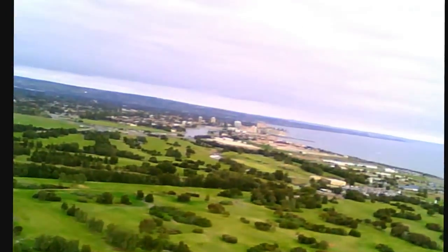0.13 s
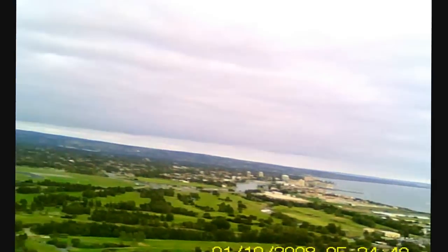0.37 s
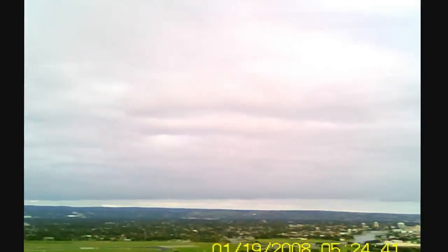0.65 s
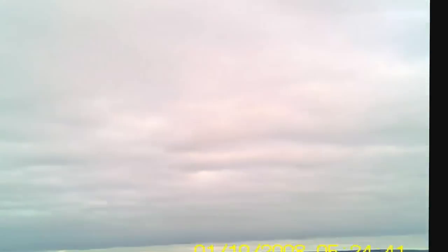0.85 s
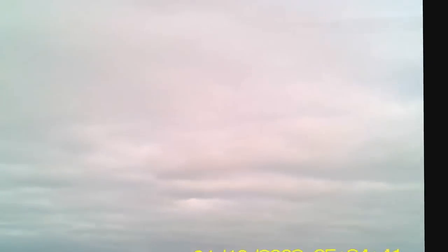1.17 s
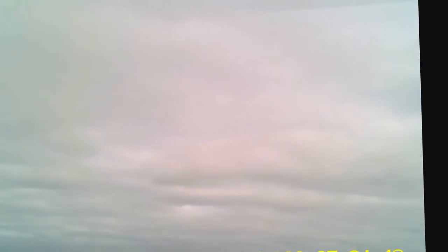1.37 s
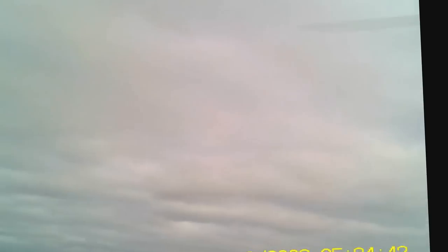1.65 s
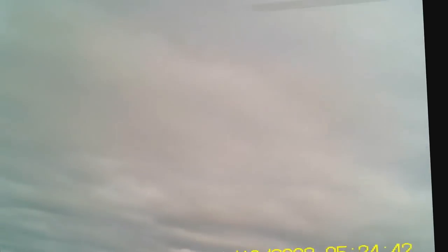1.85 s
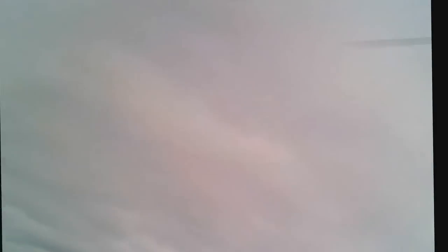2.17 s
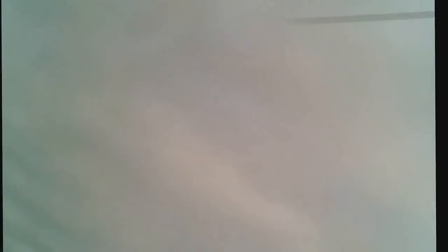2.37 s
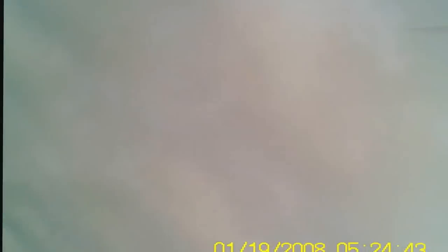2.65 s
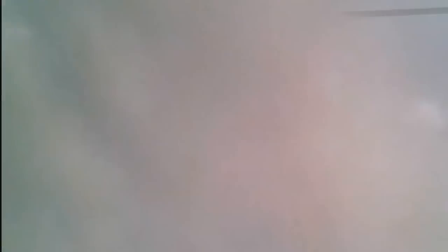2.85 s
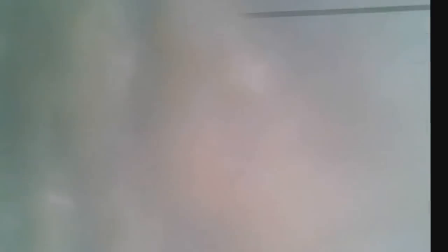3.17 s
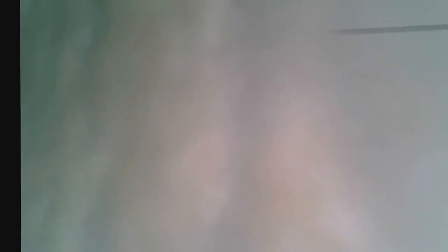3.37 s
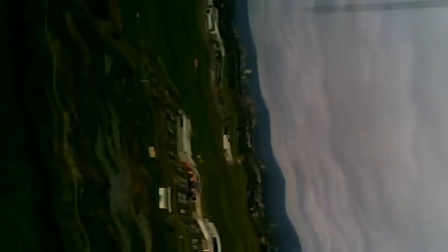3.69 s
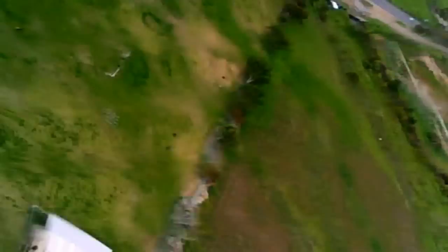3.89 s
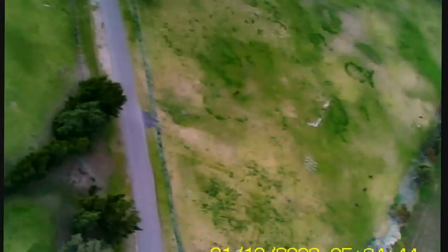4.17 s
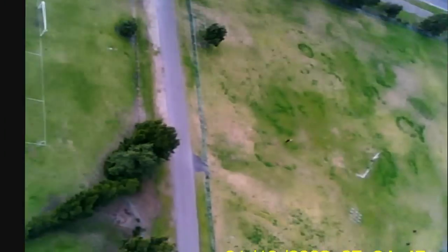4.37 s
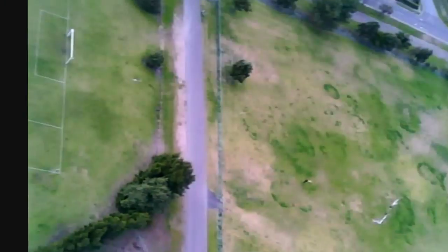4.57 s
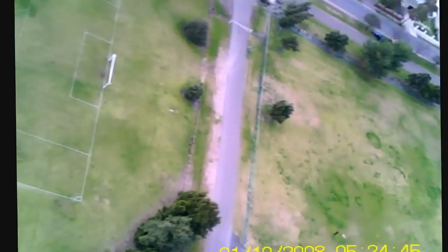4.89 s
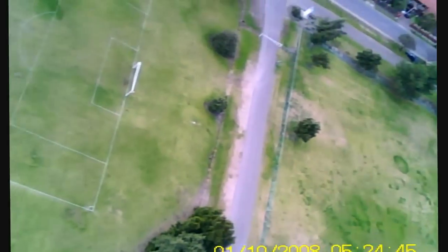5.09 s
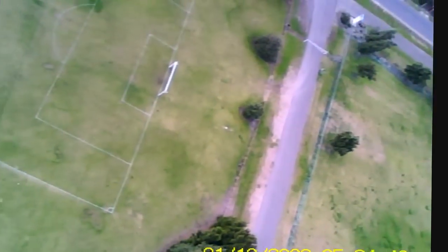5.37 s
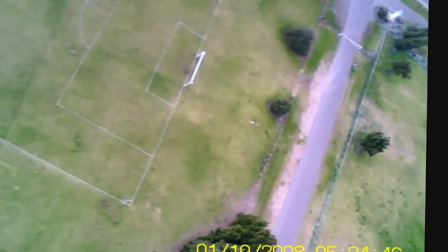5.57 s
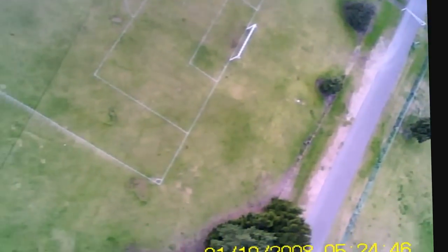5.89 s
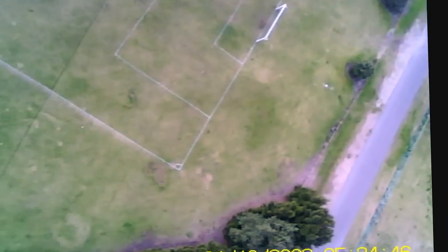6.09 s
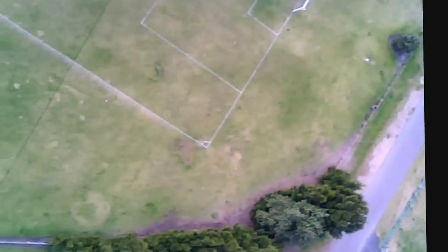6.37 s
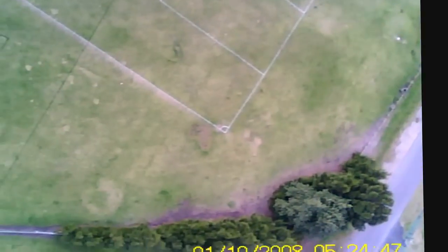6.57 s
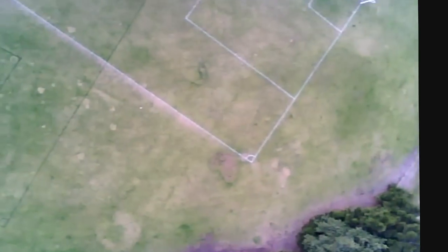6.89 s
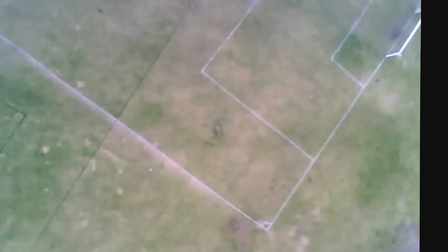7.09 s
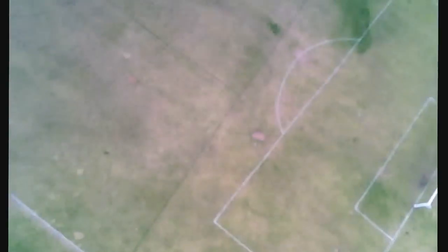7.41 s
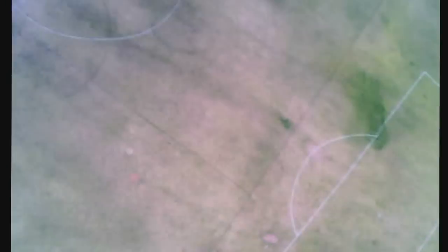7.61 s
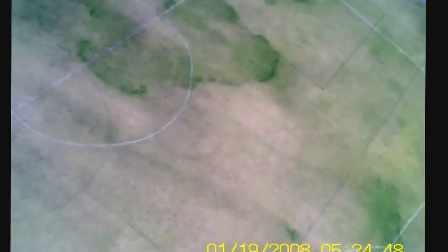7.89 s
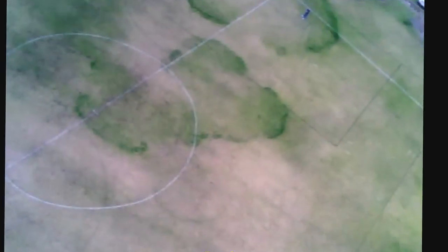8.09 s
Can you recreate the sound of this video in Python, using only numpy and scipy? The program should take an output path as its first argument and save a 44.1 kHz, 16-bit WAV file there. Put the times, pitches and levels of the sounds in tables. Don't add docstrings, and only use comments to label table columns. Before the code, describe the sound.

Close, dry propeller drone at a low pitch grows rough and loud, drops away, then climbs in pitch as wind roars and thumps the microphone.

```python
import sys
import numpy as np
from scipy import signal
from scipy.fft import rfft, irfft
from scipy.io import wavfile
from scipy.ndimage import uniform_filter1d

SR = 44100
rng = np.random.default_rng(int(sys.argv[2]) if len(sys.argv) > 2 else 0)


def to_wav(s):
    ch = np.atleast_2d(s).T
    pcm = np.round(np.clip(ch, -1, 1) * 32767)
    wavfile.write(sys.argv[1], SR, pcm.astype(np.int16))


def decibels_to_gain(level_db):
    exponent = np.asarray(level_db, float) / 20
    return 10 ** exponent


N = 363825

# stall level/dB, gain at full airspeed/dB, power law, rise per dB of extra load/dB
WIND_LAYERS = [
    (-28, 9, 0.86, 0.35),
    (-32, 9.5, 0.87, 0.23),
    (-46, 11.5, 0.86, 0.08),
    (-50.5, 12, 0.74, .05),
]
# f/Hz, level/dB
PORT_COLOUR = [(1800, -4), (2600, -2), (3100, -2), (3900, -3), (4500, -11.5), (5500, -27)]


def curves(table):
    s, *columns = np.transpose(table)
    return [np.interp(np.arange(N) / SR, s, c) for c in columns]


def walk(rate):
    k = int(SR / rate)
    steps = np.repeat(rng.standard_normal(N // k + 1), k)
    return 0.83 * uniform_filter1d(uniform_filter1d(steps, k), k)[:N]


def noise(colour):
    hz, db = np.transpose(colour)
    f = np.fft.rfftfreq(N, 1 / SR) + 1
    shape = decibels_to_gain(np.interp(np.log(f), np.log(hz), db, -90, -90))
    x = irfft(rfft(rng.standard_normal(N)) * shape, N)
    return x / x.std()


def turn(hz):
    return 2 * np.pi * np.cumsum(hz) / SR


def tone(angle, db, flutter_db):
    return np.sqrt(2) * decibels_to_gain(db + flutter_db * walk(25)) * np.cos(angle)


def swell(steady_db, events, edge_s=0.11):
    t = np.arange(N) / SR
    power = decibels_to_gain(2 * np.array(steady_db))
    for start, length, *db in events:
        to_edge = np.minimum(t - start, start + length - t)
        gate = np.clip(to_edge / (2 * edge_s) + 0.5, 0, 1)
        power += decibels_to_gain(2 * np.array(db))[:, None] * gate ** 2
    return list(10 * np.log10(power))


def wind_level(layer, speed, extra_db):
    stall_db, dive_db, law, wash = layer
    return stall_db + dive_db * speed ** law + wash * extra_db


def thumps():
    # t/s, peak level/dB
    eddies = [(1.338, -14), (4.502, -10), (4.912, -13), (5.085, -8), (5.406, -12), (5.65, -9), (5.731, -5),
              (6.253, -8), (7.119, -9), (7.367, -10.5), (7.804, -6), (8.18, -14.5)]
    rise_s, fall_s = 0.0024, 0.005
    t = np.arange(-2000, 2001) / SR
    dip = np.exp(-(t / np.where(t < 0, rise_s, fall_s)) ** 2)
    hits = np.zeros(N)
    for s, db in eddies:
        hits[int(s * SR)] = decibels_to_gain(db)
    return -signal.fftconvolve(hits, dip, "same")


def buffeting(speed, extra_db):
    # f/Hz, level/dB
    rumble = [(12, 7.5), (30, -5.5), (60, -1.5), (110, -7.5), (200, -16), (350, -21.5), (600, -28.5),
              (1200, -41)]
    # t/s, length/s, level/dB
    gusts = [
        (0.254, 0.7, -26.5),
        (1.09, 0.56, -25.5),
        (3.853, 0.27, -34),
        (5.3, 0.22, -23.5),
        (5.648, 0.073, -24),
        (6.1, 0.5, -23.5),
        (7.9, 0.64, -25.5),
    ]
    steady_db = wind_level(WIND_LAYERS[0], speed, extra_db)
    level_db = swell([steady_db], gusts)[0] + 1.5 * walk(6)
    pressure = noise(rumble)
    pressure = pressure - 0.09 * (pressure ** 2 - 1)
    travel = 2.26 * np.tanh(pressure / 2.08)
    return thumps() + decibels_to_gain(level_db + 3.5) * travel


def slipstream(speed, extra_db):
    # f/Hz, level/dB
    rush_colour = [(70, 8), (130, 12.5), (250, 7.5), (500, 4), (900, 2), (1400, 0.5), (2000, -1),
                   (2600, -7.5), (3400, -35)]
    # f/Hz, level/dB
    hiss_colour = [(3500, -9.5), (5000, -8.5), (6200, -1), (7100, -10), (7800, -5.5), (8400, 2.5),
                   (9100, -4), (10200, -10.5), (10700, -17.5), (11200, -36.5)]
    rush_db, port_db, hiss_db = (wind_level(layer, speed, extra_db) for layer in WIND_LAYERS[1:])
    eddy_db = walk(150) * decibels_to_gain(0.27 * (hiss_db + 38.5))
    rush = decibels_to_gain(rush_db + 4 + 1.14 * eddy_db) * noise(rush_colour)
    port = decibels_to_gain(port_db + 3 + 0.65 * eddy_db) * noise(PORT_COLOUR)
    hiss = decibels_to_gain(hiss_db + 6.5 + 0.33 * eddy_db) * noise(hiss_colour)
    return rush + port + hiss


def separated_flow(first_db, second_db):
    # f/Hz, level/dB
    roar = [(200, -12), (450, -7.5), (800, -1), (1200, -6.5), (2200, -34)]
    level_db = first_db + 0.18 * (second_db + 24.5)
    return decibels_to_gain(level_db - 23.5) * noise(roar) + decibels_to_gain(level_db - 36.5) * noise(PORT_COLOUR)


def motor(blade, speed):
    # t/s, switching tone f/Hz
    clock = [(0, 8091), (4.0, 8084.6), (5.5, 8076.2), (7.0, 8070.5), (8.25, 8067.8)]
    # t/s, level/dB
    current = [(0, -26), (1.5, -25), (3.75, -26.5), (4.0, -28), (5.3, -29), (5.8, -28.5), (8.25, -31.5)]
    # t/s, length/s, first lower sideband level/dB
    yaws = [
        (3.12, 0.45, -38.5),
        (3.67, 0.55, -44.5),
        (4.17, 2.1, -48),
    ]
    side_orders = [-42, -21, -6, -4, -1, 1, 2, 4, 6, 7, 8, 10, 12, 14, 16, 21]
    side_levels = [-64, -62, -66, -66, -63, -61, -52, -39.5, -42, -58, -45, -50, -58, -58.5, -68, -67]
    cogging_orders = [11, 13, 21, 42, 63, 70, 84]
    cogging_levels = [-6, 1, -2, 1, -32, -18, -14.5]

    (switch_hz,), (switch_db,) = curves(clock), curves(current)
    whine_db = -45.3 - 22 * speed ** 1.4
    lower_db, = swell([-55.5 + 3.0 * walk(1.9)], yaws)
    switch = turn(switch_hz) + 0.06 * walk(60) * decibels_to_gain(5 * walk(6)) + 0.04 * walk(400)
    out = tone(switch, switch_db, 0.21) + tone(switch - blade, lower_db, 0.73)
    shift_db = 0.55 * np.clip(lower_db + 51, 0, 12)
    for k, db in zip(side_orders, side_levels):
        level_db = db + shift_db * ((k == 2) - 1.0 * (k == 4))
        level_db = level_db + (switch_db + 26.5) * (k < 2 or k > 6)
        out += tone(switch + k * blade / 2 + 7 * rng.random(), level_db, 1.1)
    for k, db in zip(cogging_orders, cogging_levels):
        out += tone(k * blade / 2 + 0.22 * walk(40), whine_db + db, 0.46)
    return out


def harmonics(load_db, speed):
    # stall level/dB, gain at full airspeed/dB
    clean = [
        (-50, 8.5),
        (-39.5, 9.5),
        (-56, 15),
    ]
    # t/s, length/s, 2nd level/dB, 3rd level/dB,
    # 4th level/dB
    episodes = [(.53, 1.82, -33.5, -41, -54), (2.882, 0.21, -33.5, -33, -48), (3.103, 0.16, -25.5, -36, -40),
                (3.254, 0.13, -21.5, -35, -32.5), (3.348, 0.1, -33, -25, -30), (3.45, 0.075, -26, -38, -37),
                (3.527, 0.24, -19.5, -44, -32), (3.564, .1, -20, -28, -35), (3.835, 0.22, -29, -37, -54),
                (4.0, 0.3, -36.5, -34, -53), (4.232, 0.435, -25.5, -51, -58), (4.674, 1.05, -27, -41.5, -44),
                (5.72, 0.63, -30.5, -34, -50), (6.201, .45, -25.5, -34, -37), (6.65, 0.453, -21.5, -38, -41.5),
                (7.1, 1.3, -26, -34, -38)]
    upper_db = swell([db + dive_db * speed for db, dive_db in clean], episodes, edge_s=0.028)
    first_db = load_db + 1.2 * speed * walk(7)
    return [first_db] + [db + 0.85 * walk(5) for db in upper_db]


def propeller(blade, lean, blades_db, speed):
    # stall level/dB, gain at full airspeed/dB
    wobble = [
        (-37, 8.5),
        (-43, -14),
        (-45.5, 7),
    ]
    # t/s, length/s, 1st level/dB, 3rd level/dB, 5th level/dB
    shakes = [
        (2.262, 0.52, -36, -27, -39.5),
        (2.695, 0.59, -20.5, -23.5, -38.5),
        (3.306, .5, -25, -33, -36.5),
        (3.8, 0.2, -24.5, -44, -41),
        (5.15, 0.85, -29, -39, -35),
    ]
    odds_db = swell([db + dive_db * speed + 4.2 * walk(4) for db, dive_db in wobble], shakes)
    odds_db += [odds_db[-1] - 4.0, odds_db[-1] - 9.5]
    sharp_db = blades_db[-1] + 0.35 * (blades_db[0] + 10.5)
    blades_db = blades_db + [sharp_db - 4.0, sharp_db - 8.5, sharp_db - 12]
    blade = blade + 0.047 * walk(30)
    out = np.zeros(N)
    for k, db in enumerate(blades_db):
        out += tone((k + 1) * blade + lean, db, 0.5 + 0.2 * k)
    for k, db in enumerate(odds_db):
        out += tone((k + 1 / 2) * blade + lean + 1.4, db, 0.63)
    return out


def scene():
    # t/s, blade rate f/Hz
    propeller_speed = [(0.0, 168.1), (1.0, 165.9), (1.75, 164.8), (2.75, 164.7), (3.25, 165.2),
                       (3.75, 164.6), (4.0, 166.2), (4.25, 169.8), (4.5, 172.7), (5.5, 182.9),
                       (5.75, 187.1), (6.25, 193.8), (7.0, 206.9), (7.25, 210.1), (7.75, 214.2),
                       (8.25, 214.2)]
    # t/s, level/dB
    blade_load = [(0, -18), (.4, -16), (.7, -18.5), (1.0, -22.5), (1.96, -24), (2.38, -15.5), (2.7, -11.5),
                  (3.3, -9.5), (3.45, -10.5), (3.75, -8), (3.98, -12), (4.05, -16.5), (4.2, -25.5),
                  (4.43, -37), (4.66, -27), (5.6, -19.5), (6.6, -17.5), (8.25, -19.5)]
    # t/s, lean/rad, depth of its puff in the slipstream/0-1, lag of the puff/rad
    pulse = [
        (0, 1.9, 0.26, 4.65),
        (2.2, 3.2, 0.05, 2.7),
        (3.2, 3.07, 0.3, 5.9),
        (3.9, 3.54, 0.07, 1.25),
        (4.4, 3.83, 0.14, 2),
        (6, 4.7, 0.19, 2.8),
        (8.25, 3.8, 0.16, 6.2),
    ]
    (blade_hz,), (load_db,) = curves(propeller_speed), curves(blade_load)
    lean, depth, lag = curves(pulse)
    stall_hz, dive_hz = 164.5, 214.2
    speed = np.clip((blade_hz - stall_hz) / (dive_hz - stall_hz), 0, 1)
    plain_load_db = -22 + 11.5 * np.sqrt(speed)
    extra_db = np.clip(load_db - plain_load_db, 0, None)
    blades_db = harmonics(load_db, speed)
    blade = turn(blade_hz) + 0.016 * walk(13)
    puff = 1 + depth * np.cos(blade + lean - lag)

    air = buffeting(speed, extra_db) + puff * slipstream(speed, extra_db)
    air += puff ** 3 * separated_flow(*blades_db[:2])
    return (air + motor(blade, speed) + propeller(blade, lean, blades_db, speed))[None]


def top_cut(x):
    return signal.sosfilt(signal.butter(12, 11320, fs=SR, output="sos"), x)


def record(dry):
    bent = dry - 0.11 * (dry ** 2 - uniform_filter1d(dry ** 2, 2000)) - 0.012
    rounded = 1.014 * bent / (1 + (bent / 0.98) ** 6) ** (1 / 6)
    return top_cut(np.clip(rounded, -1, 1))


dry = scene()
out = record(dry)
to_wav(out)
```